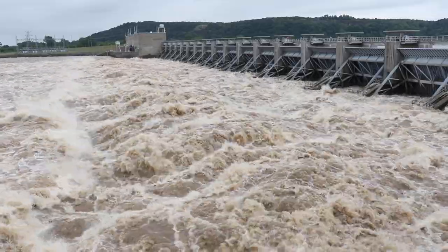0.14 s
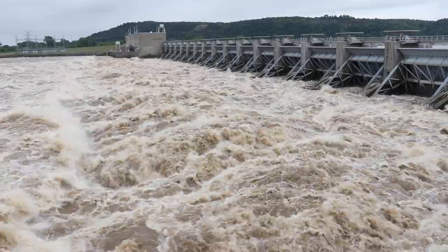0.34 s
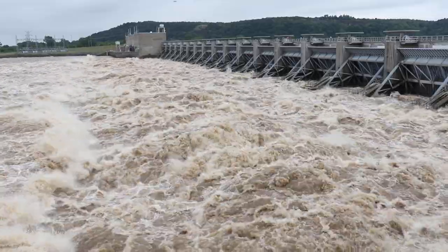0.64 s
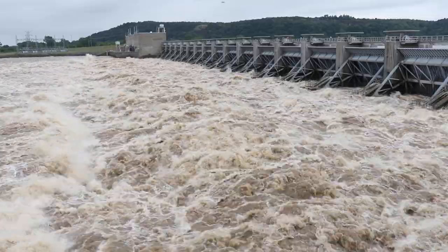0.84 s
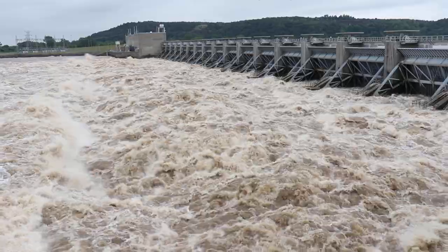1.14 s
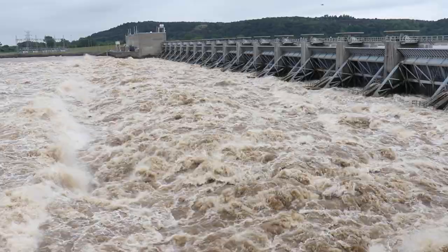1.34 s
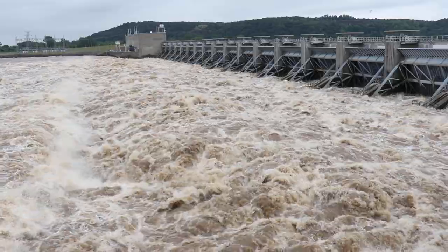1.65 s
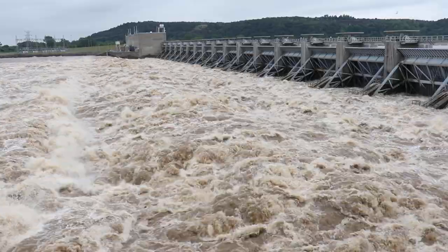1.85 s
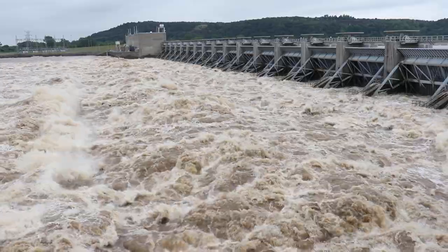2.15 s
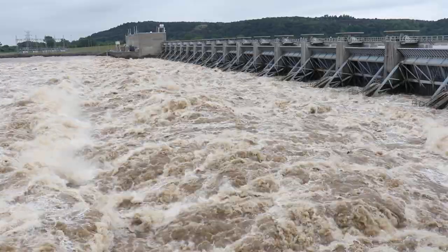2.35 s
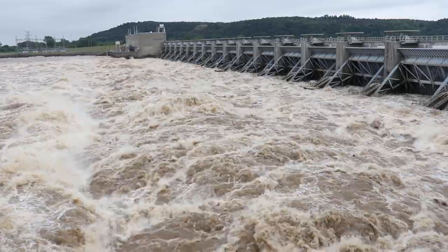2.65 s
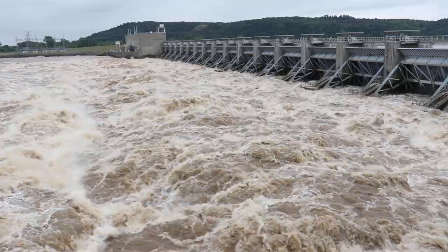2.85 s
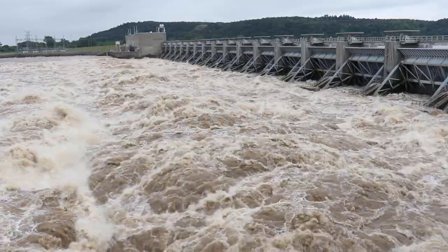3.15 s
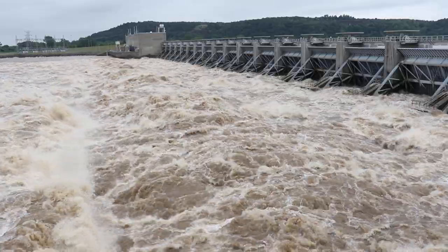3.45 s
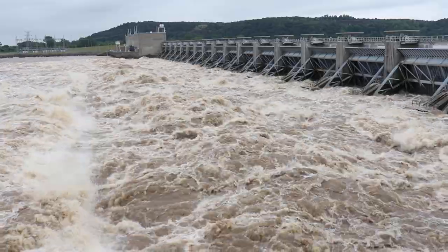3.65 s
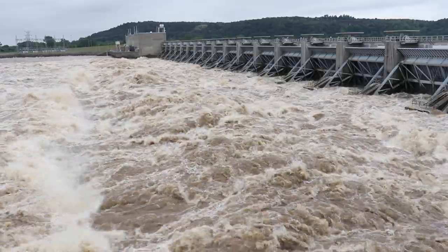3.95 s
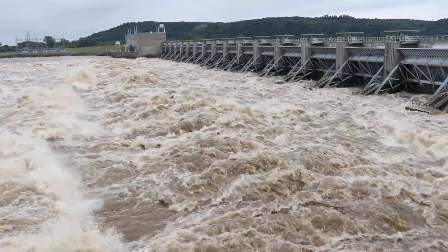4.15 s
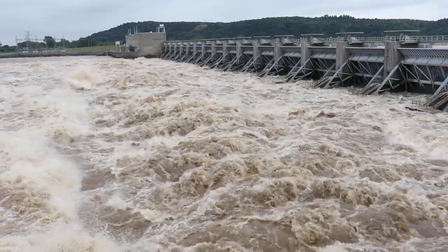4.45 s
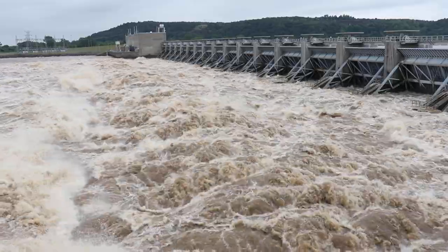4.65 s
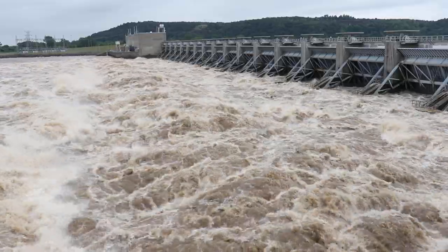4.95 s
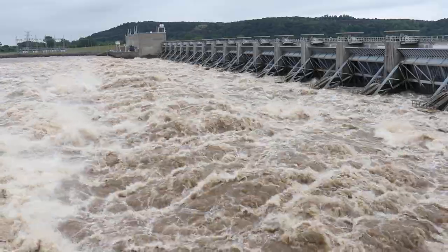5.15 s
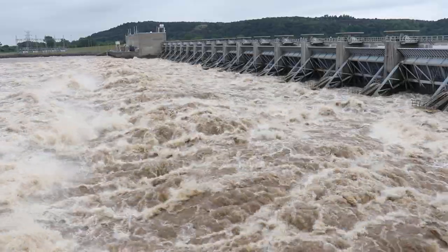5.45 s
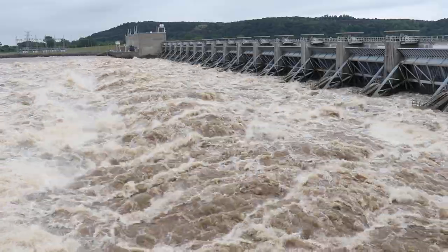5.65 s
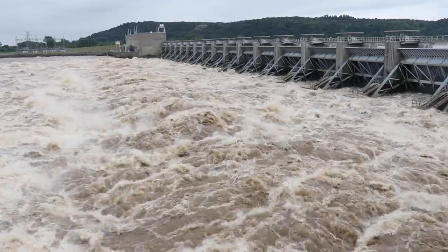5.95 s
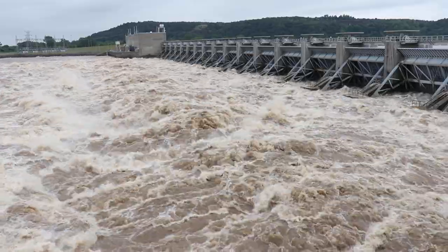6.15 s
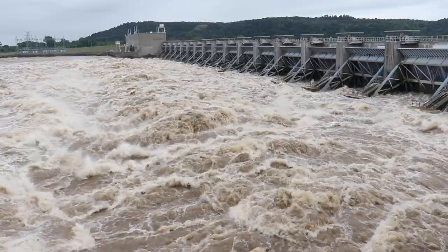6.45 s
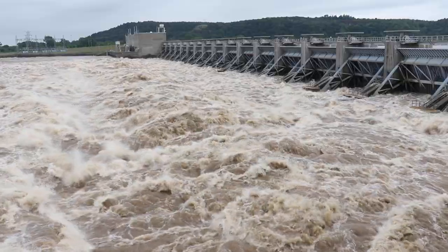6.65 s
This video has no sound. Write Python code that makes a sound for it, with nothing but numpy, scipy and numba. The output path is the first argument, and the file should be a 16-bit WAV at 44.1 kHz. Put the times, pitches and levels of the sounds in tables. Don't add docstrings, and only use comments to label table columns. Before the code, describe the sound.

Brown floodwater boils below a long row of spillway gates outdoors. Countless bubbles blur into one loud, continuous noise-like rush: broad roar, churning middle, fizzing froth and fine hissing spray. Small quick surges ripple through it, never stopping. A small microphone on the bank trims the deep bass; the sound is nearly mono, with a barely noticeable breeze beneath.

```python
import sys
import numpy as np
from scipy import signal
from scipy.fft import rfft, irfft
from scipy.io import wavfile
from scipy.ndimage import uniform_filter1d
from numba import njit

SR = 44100
rng = np.random.default_rng(int(sys.argv[2]) if len(sys.argv) > 2 else 0)


def generate_wav(signal):
    frames = np.transpose(np.atleast_2d(signal))
    scaled = np.clip(frames, -1, 1) * 32767
    pcm = np.round(scaled).astype(np.int16)
    wavfile.write(sys.argv[1], SR, pcm)


def field_ratio(decibels):
    return 10 ** (np.asarray(decibels, dtype=float) / 20)


N = 299880
FREQ = np.maximum(np.fft.rfftfreq(N, 1 / SR), 1)
BAND_HZ = 689


def unit(x):
    return x / np.sqrt(np.mean(x ** 2))


def colour(x, points):
    hz, db = np.transpose(points)
    gain_db = np.interp(np.log(FREQ), np.log(hz), db)
    return irfft(rfft(x) * field_ratio(gain_db), N)


def walk(rate):
    hold = int(SR / rate)
    steps = np.repeat(rng.standard_normal(N // hold + 1), hold)
    smooth = uniform_filter1d(uniform_filter1d(steps, hold), hold)
    return unit(smooth[:N])


@njit
def ring(start, hz, size, cycles, glide, length):
    out = np.zeros(length)
    for k in range(len(start)):
        span = int(5 * cycles * SR / hz[k])
        phasor = size[k] + 0j
        turn = np.exp((2j * np.pi - 1 / cycles) * hz[k] / SR)
        rise = np.exp(2j * np.pi * hz[k] * glide / SR / span)
        for i in range(start[k], min(start[k] + span, length)):
            out[i] += phasor.imag
            phasor *= turn
            turn *= rise
    return out


def bubbles(cycles=3.2, glide=0.13, spread_db=2.5):
    per_second = 12000
    when, pitch, strength = rng.random((int(per_second * N / SR), 3)).T
    hz = 150 + 14000 * pitch
    size = field_ratio(-spread_db * np.log(1 - .98 * strength)) * np.sqrt(hz)
    return unit(ring((when * N).astype(np.int64), hz, size, cycles, glide, N))


def surge(size):
    # centre in seconds, strength in dB,
    # length in seconds, favoured bubble size from -1 (big roar) to 1 (fine spray).
    waves = [(.30, 0.9, 0.093, -.4), (.52, 0.6, .14, 0.7), (.68, 0.5, 0.15, -.7), (1.00, -.6, .12, -0.5),
             (1.18, 1, .14, 0.1), (1.35, -0.5, .12, .6), (1.73, 0.9, 0.17, -.5), (2.006, 1.6, 0.11, -0.5),
             (2.474, -1.2, 0.11, 0.1), (2.69, 1.1, 0.094, -0.7), (2.98, -.5, 0.13, -.5),
             (3.13, 1, 0.13, -.1), (3.33, -1.2, 0.079, .2), (3.62, 1.1, 0.27, 0.3), (3.86, -0.2, .1, -.1),
             (4.05, 0.3, .18, 0.6), (4.33, -1.7, .16, 0.4), (4.54, 0.2, 0.11, 0.3), (4.70, 0.9, 0.3, 0.3),
             (4.90, -.9, 0.071, -0.2), (5.12, -.5, 0.11, -.6), (5.62, -0.3, .26, .3),
             (6.002, 1.2, .18, -.1), (6.315, .7, .1, -.5), (6.625, 1.2, 0.13, -.4)]
    # time in seconds, flow in dB, spray in dB.
    flow = [
        (0, 0.1, .3),
        (1.2, 0.37, .2),
        (2.2, 0.05, -1.1),
        (3.6, 0, .1),
        (5.0, -0.17, 0.6),
        (6.8, -0.65, -0.8),
    ]
    t = np.arange(0, N, 64) / SR
    s, db, length, favoured = np.transpose(waves)[:, :, None]
    humps = db * (1 + favoured * size) * np.exp(-.5 * ((t - s) / (.5 * length)) ** 2)
    at, flow_db, spray_db = np.transpose(flow)
    slow = np.interp(t, at, flow_db + max(size, 0) * spray_db)
    return np.interp(np.arange(N) / SR, t, slow + humps.sum(axis=0))


def whitewater(near_db=-9):
    # frequency in Hz, level in dB per Hz.
    rush_shape = [(53, -55), (90, -27.5), (127, -13.5), (183, -6), (280, -1.5), (600, 1), (1500, -0.5),
                  (3300, -5), (5100, -10.5), (6700, -8.5), (8400, -8), (10500, -12.5), (13000, -19),
                  (15700, -29.5)]
    layer_edges_hz = [1300, 4500, 9500]
    layer_size = [-1.2, -0.017, 0.19, 1]
    flicker_by_layer_db = [0.45, 0.41, 0.24, 0.27]
    far_and_near = rng.standard_normal(N) + field_ratio(near_db) * bubbles()
    water = rfft(unit(colour(far_and_near, rush_shape)))
    above = [np.ones(len(FREQ))] + [1 / (1 + (hz / FREQ) ** 4) for hz in layer_edges_hz] + [0]
    throb_db = 0.26 * walk(rate=9)
    gust_db = 0.42 * walk(rate=7)
    out = 0
    for k, (size, flicker_db) in enumerate(zip(layer_size, flicker_by_layer_db)):
        layer = irfft(water * (above[k] - above[k + 1]), N)
        level_db = surge(size=size) + throb_db + max(size + .5, 0) * gust_db
        out = out + layer * field_ratio(level_db + flicker_db * walk(rate=12))
    return field_ratio(-18) * out


def breeze():
    # frequency in Hz, level in dB per Hz.
    wind_shape = [(15, -14), (32, 0), (52, 4), (80, -9), (110, -28)]
    return unit(colour(rng.standard_normal(N), wind_shape)) * field_ratio(-63.5 + 1.7 * walk(rate=2.9))


def treble_patches():
    # centre in seconds, lowest frequency in Hz, width in bands.
    patches = [(1.015, 8960, 2), (1.131, 8270, 2), (2.524, 4130, 4), (2.617, 5510, 2), (2.757, 6200, 2),
               (3.151, 6890, 2), (3.546, 5510, 2), (3.569, 5170, 2), (3.709, 6200, 2), (3.848, 8270, 2),
               (3.894, 7580, 2), (3.941, 5510, 2), (3.987, 4480, 2), (3.987, 8960, 2), (4.359, 5510, 2),
               (4.359, 8270, 2), (4.359, 10340, 2), (4.475, 5510, 4), (5.009, 7580, 6), (5.148, 9650, 2),
               (5.241, 7580, 2), (5.241, 9650, 2), (5.311, 6890, 2), (5.682, 8270, 3), (6.147, 4480, 2),
               (6.379, 4130, 2), (6.634, 10340, 2), (6.681, 8270, 2)]
    top_hz, top_share = 11710, .7
    rows = [(s, hz, hz + bands * BAND_HZ) for s, hz, bands in patches]
    moments = sorted({row[0] for row in rows})
    for s, (pick, place, wide) in zip(moments, rng.random((len(rows), 3))):
        low_hz = top_hz + BAND_HZ * int(5 * place ** 1.5)
        if pick < top_share:
            rows.append((s, low_hz, low_hz + BAND_HZ * (2 + (wide < .3))))
    return rows


def part_channels(dry):
    frame, grid = 2048, 737
    hop = frame // 2
    mid = np.pad(dry.mean(axis=0), frame)
    other = np.roll(mid, -2 * frame)
    out = np.tile(mid, (2, 1))
    n = np.arange(frame) + .5
    window = signal.windows.kaiser_bessel_derived(frame, 4 * np.pi)
    for s, low_hz, high_hz in treble_patches():
        start = grid + hop * round((s * SR - grid) / hop) + hop
        lines = np.arange(round(low_hz * frame / SR), round(high_hz * frame / SR)) + .5
        basis = window * np.cos(np.pi / hop * np.outer(lines, n + hop / 2)) * np.sqrt(2 / hop)
        old, side = (v[start:start + frame] @ basis.T @ basis for v in (mid, other))
        left_right = side * np.array([[1], [-1]])
        out[:, start:start + frame] += np.sqrt(.5) * (old + left_right) - old
    return out[:, frame:-frame]


def scene():
    return np.tile(whitewater() + breeze(), (2, 1))


def band_limit(x):
    return signal.sosfilt(signal.butter(12, 15700, fs=SR, output="sos"), x)


def record(dry):
    mix = part_channels(dry)
    return band_limit(mix)


dry = scene()
out = record(dry)
generate_wav(out)
```